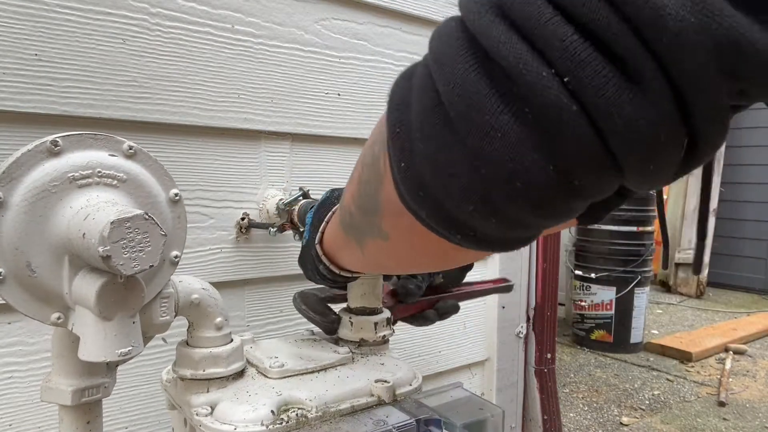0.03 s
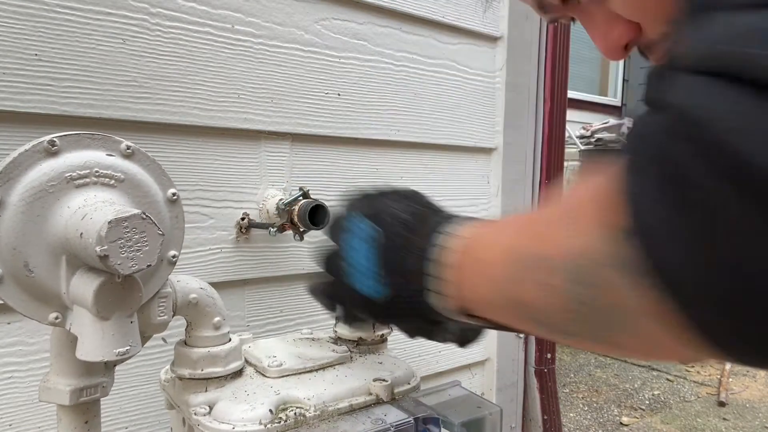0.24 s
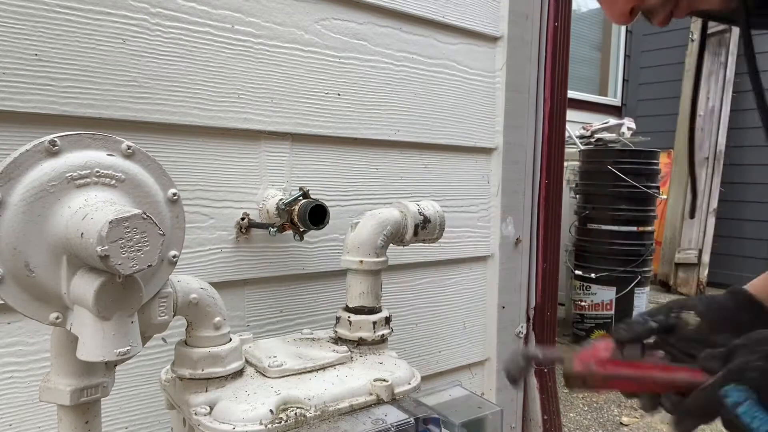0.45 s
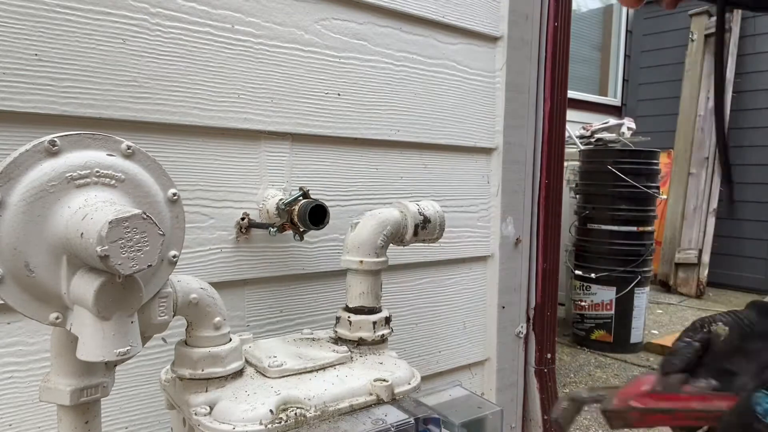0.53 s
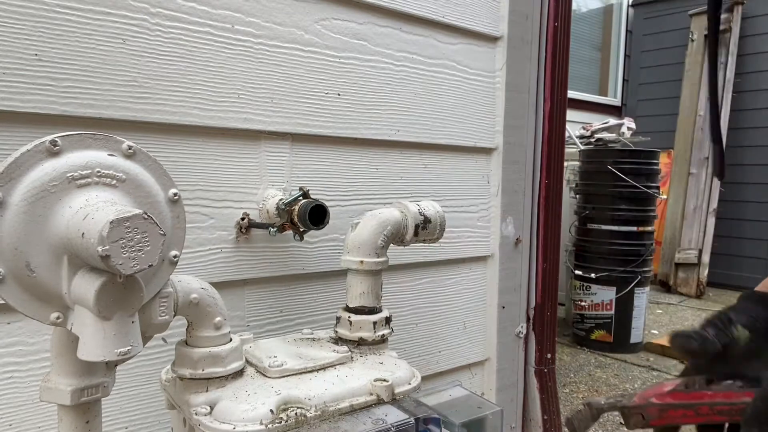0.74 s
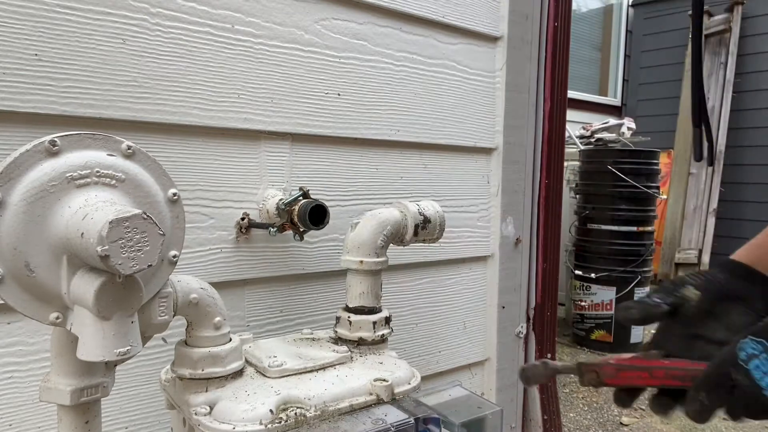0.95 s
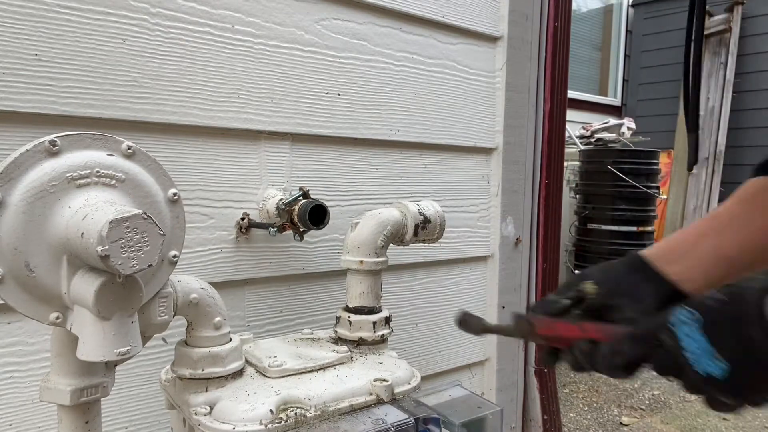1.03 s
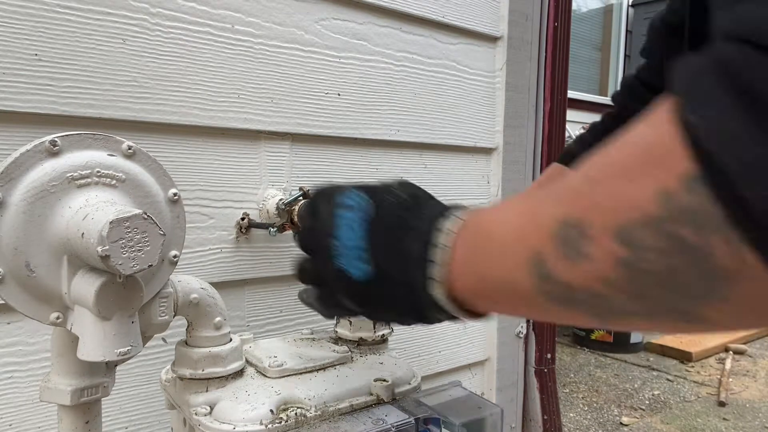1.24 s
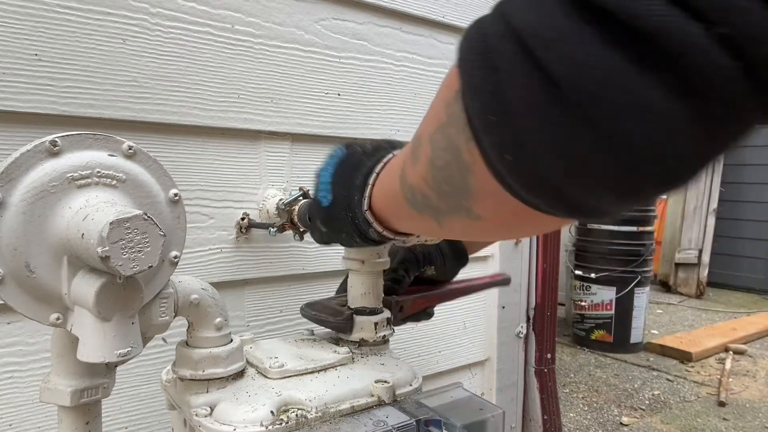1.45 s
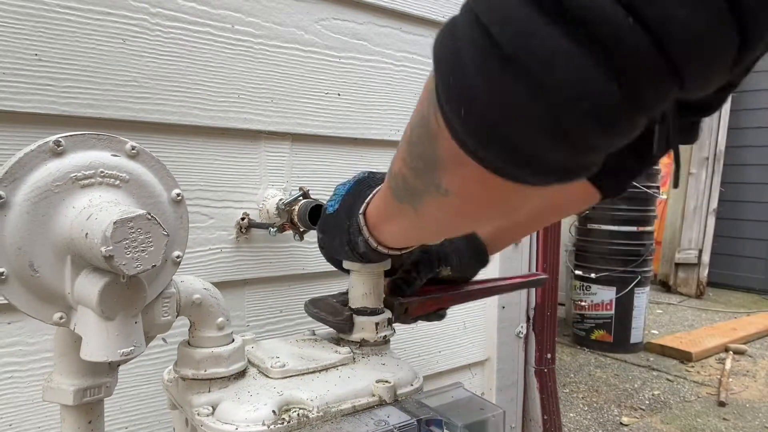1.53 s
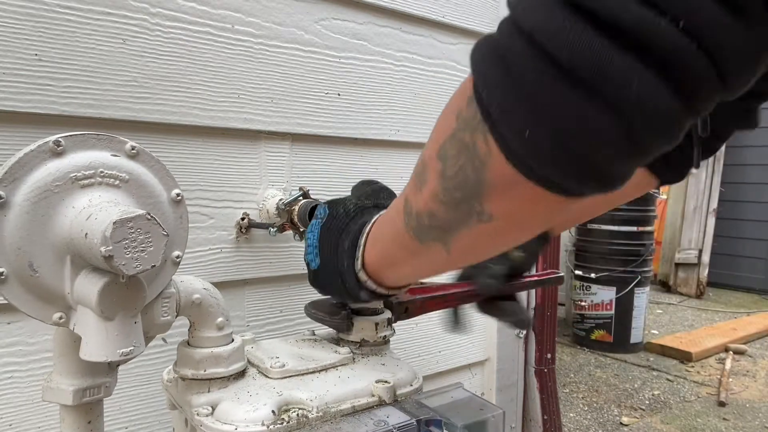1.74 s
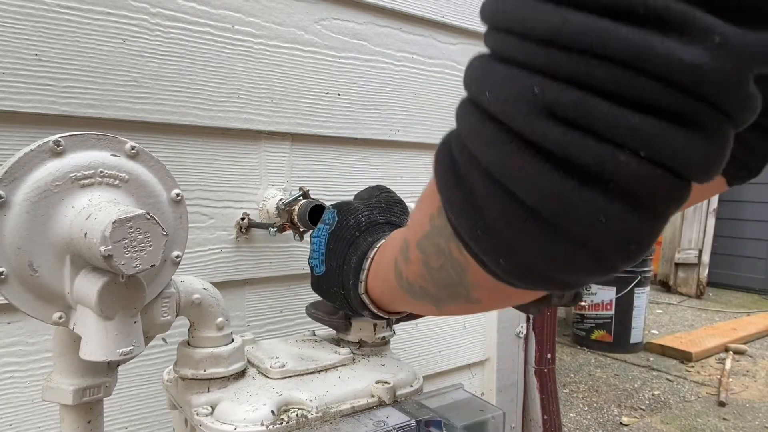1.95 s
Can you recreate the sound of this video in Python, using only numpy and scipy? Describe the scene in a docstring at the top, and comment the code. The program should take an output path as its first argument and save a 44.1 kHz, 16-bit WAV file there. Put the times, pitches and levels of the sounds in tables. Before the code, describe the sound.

Steel pipe wrench clanks and clinks against a metal pipe fitting outdoors.

```python
"""A sleeve swishes and steel clanks, close to the microphone, outdoors by a house wall.
A pipe wrench is pulled off a gas meter's pipe fitting, carried aside and set on again.
Its loose jaw clinks, and squeaks once as it sticks and slips; pipe and meter ring with dull clanks.
Gloves and sleeves rub on the metal, the yard gives short echoes, and a low rumble lies far behind."""
import sys
import numpy as np
from scipy import signal
from scipy.fft import rfft, irfft
from scipy.io import wavfile

SR = 44100
rng = np.random.default_rng(int(sys.argv[2]) if len(sys.argv) > 2 else 0)


def unload_wav(signal):
    """Save mono or channel-first audio to the path in sys.argv[1] as 16-bit WAV at rate SR, clipped to [-1, 1]."""
    wavfile.write(
        sys.argv[1],
        SR,
        np.round(np.clip(np.atleast_2d(signal).T, -1, 1) * 32767).astype(np.int16),
    )


N = 88200

# Wrench on pipe, and the loose jaw and nut rattling. Each row: start in seconds, level in dB in each
# of seven bands, contact time in seconds, share of the free ring time.
PIPE_CLANKS = [(0.1162, -47.5, -44, -40.5, -40.5, -40.5, -49, -65, 0.0014, 0.7),
               (0.2597, -39, -21.5, -36, -17.5, -19.5, -28.5, -39, 0.0029, 0.42),
               (0.2706, -46.5, -33.5, -61, -52, -50, -28.0, -38, 0.0007, 1.1),
               (1.2408, -44.0, -32.5, -34.5, -27.5, -21.5, -29, -34, 0.0023, 0.81),
               (1.277, -59, -41, -48, -50, -62, -67, -63, 0.0019, 0.9),
               (1.3045, -56, -56, -54, -45.5, -47.5, -44, -53, 0.0018, 0.45),
               (1.4145, -35, -39, -30, -34, -41, -46, -51, 0.0066, 0.45),
               (1.78, -64, -68.5, -64, -50, -62.5, -76, -64, 0.0039, 0.65)]
JAW_CLINKS = [(.148, -44, -39, -36, -47, -51, -46.5, -60, 0.0027, .55),
              (.2078, -42, -31, -22, -31.5, -39, -22.5, -42.5, 0.0024, 0.37),
              (.349, -57, -47.5, -50, -77, -77, -61, -60, 0.00044, 0.06),
              (.446, -72, -45.5, -39.5, -56, -62, -53, -58, 0.0017, 0.36),
              (.4664, -40.5, -27.5, -27.5, -32, -35, -30.5, -38.5, 0.0025, 0.34),
              (.51, -50.5, -43, -44, -47, -70, -56, -70, 0.0023, 0.68),
              (.586, -55, -44, -46, -62, -68, -63, -85, 0.00059, .5),
              (.7046, -52.5, -36, -37.5, -37.5, -50, -49.5, -63, 0.0018, 0.5),
              (.8125, -54.5, -48, -39, -61, -51, -69, -56, .013, 0.31),
              (.841, -60.5, -41.5, -50, -40.5, -68, -75, -82, .0013, 0.74),
              (.862, -50, -37.5, -33.5, -33, -44, -43.5, -56, 0.0013, 0.28),
              (.96, -70, -43.5, -41, -43.5, -42, -44, -57, 0.0016, 0.42),
              (1.0215, -57, -54, -44, -44, -55, -47.5, -66, .0011, .5),
              (1.0325, -63.5, -43.5, -42, -45, -55, -39.5, -45, .0022, 0.71),
              (1.0428, -39.5, -32, -26, -41.5, -36, -39, -44, 0.0038, 0.46),
              (1.064, -41, -43.5, -39, -61, -67, -67, -69, 0.0024, 0.31),
              (1.155, -63.5, -53, -63, -77, -85, -89, -97, .0009, 0.43),
              (1.701, -58.5, -57, -54.5, -56.5, -67, -55.5, -61, .001, .25)]
# The edges of those seven bands, in Hz.
PIPE_EDGES_HZ = [250, 550, 1150, 1550, 2800, 4200, 8000, 16000]
JAW_EDGES_HZ = [800, 1800, 4200, 8000, 9100, 9950, 14000, 16000]
# Modes of the pipe with the meter case, and of the steel jaw with its nut.
# Each row: frequency in Hz, relative level in dB before the bands are set, free t60 in seconds.
PIPE_MODES = [(230.7, -5.5, 0.2), (426, 4, .13), (645, 1, .12), (811.5, 7.5, 0.062), (1093, 17, 0.038),
              (1298, 20.5, 0.025), (1700, 16, 0.05), (2200, 2, .025), (2492, -9.5, .1), (2790, -21.5, .55),
              (3173, 25, .027), (5360, 9, 0.062), (6700, -9, .04), (10690, 1.5, 0.053)]
JAW_MODES = [(1250, 4, .17), (2260, -6, .08), (2800, 2, .04), (3410, 10, .05), (3500, -9, .25),
             (5380, 4, .08), (5850, 4, .07), (7010, 4, .09), (8680, 5, .15), (9560, 4, .07),
             (10335, 9, .065), (11025, 5, .07), (12130, 4, .08), (13310, 4, .09), (14840, 2, .1)]
# The jaw squeaking, the sleeve swinging with the arm, the glove sliding along the pipe.
# Each row: time in seconds, level in dB.
SQUEAK_LEVEL = [(.811, -60), (.8155, -31), (.821, -22), (.828, -29), (.832, -38), (.835, -32), (.845, -41),
                (.862, -49), (.91, -70)]
SLEEVE_LEVEL = [(0, -71.5), (.13, -59.5), (.37, -60), (.44, -52.5), (.53, -53.5), (.57, -63.5),
                (.645, -48.5), (.69, -62), (.79, -70), (.99, -61), (1.18, -72), (1.4, -63), (2, -79)]
GLOVE_LEVEL = [(1.44, -88), (1.525, -57.5), (1.56, -83), (1.64, -68), (1.705, -49), (1.755, -50),
               (1.81, -64.5), (2, -71.5)]
# Tone of sleeve, glove, yard echoes and distant rumble. Each row: frequency in Hz, relative level in dB.
SLEEVE_TONE = [(200, -10.5), (1300, -1.5), (3300, -0.5), (6500, -5.5), (10000, -8.5), (12000, -13),
               (15000, -13)]
GLOVE_TONE = [(200, -21.5), (1500, -4.5), (3300, -0.5), (8500, -1.5), (10500, -4.5), (13000, -0.5),
              (16000, -3)]
YARD_TONE = [(600, 2), (1700, -3), (2500, -4), (3150, -7.5), (3900, -0.5), (8000, -4.5), (15000, 0.5)]
RUMBLE_TONE = [(20, -38), (50, -19.5), (70, -10), (90, 3), (125, 3.5), (160, -1), (210, -2.5), (300, -13),
               (430, -14.5), (700, -20.5), (1500, -28.5), (3000, -50.5), (8000, -80)]
# Decay of the yard's echoes. Each row: frequency in Hz, t60 in seconds.
YARD_T60 = [(200, 0.41), (1000, 0.13), (3000, 0.23), (7000, 0.15)]
# Stereo width of the near and far sounds; the near ones narrow to the centre in the top treble.
# Each row: frequency in Hz, side gain in dB.
NEAR_WIDTH = [(300, -12.5), (700, -9.5), (1400, 3), (3200, -2.5), (5400, 4), (9500, 1), (12500, -18.5)]
RUMBLE_WIDTH = [(30, -5.5), (90, -20.5), (200, -8.5), (500, -4.5), (4000, 12.5), (12000, -1.5)]

CHATTER_DB = -10.5  # slips within a contact, against its first impact
HUMP_WIDTH_HZ, VALLEY_DB = 81.5, -1.5  # clatter round the modes: width at 1 kHz, floor between them
SQUEAK_HZ, SQUEAK_WAVER = 8710, 0.0021
RUB_GRAIN_DB, FRICTION_SIDE_DB = 1.5, -3.5
YARD_DB, YARD_DELAY_S = -12.5, .008
RUMBLE_DB, HUM_HZ, HUM_DB, HUM_WAVER = -46, 132.03, -49.5, 0.0234
PAN_RIGHT_DB, CUTOFF_HZ = 0.22, 15900


def wrench_blows(rows, modes, edges, clatter_db, clatter_t60):
    """Blows on one piece of metal, close up; a firmer grip shortens the ring."""
    out = np.zeros((2, N))
    for start_s, *band_db, contact_s, ring_share in rows:
        held_modes = [(hz, db, t60 * ring_share) for hz, db, t60 in modes]
        blow = strike(held_modes, clatter_db, clatter_t60 * ring_share, contact_s)
        add(out, start_s, strike_position(blow, edges, band_db))
    return out


def strike(modes, clatter_db, clatter_t60, contact_s):
    """A chattering contact rings the metal's modes and stirs a noisy clatter around them."""
    t = np.arange(SR // 3) / SR
    hz, db, t60 = np.transpose(modes)[:, :, None]
    phase, lean = rng.uniform(-1.054, 1, (2, len(modes), 1))
    spread = np.sign(lean) * np.arctan(amp(read(NEAR_WIDTH, hz)))  # opposite phase shift in each channel
    fade = amp(db - 60 * t / t60)
    angle = 2 * np.pi * (hz * t + phase)
    ring = np.array([(fade * np.sin(angle + channel * spread)).sum(0) for channel in (1, -1)])
    mid, side, slips = rng.standard_normal((3, len(t)))
    clatter = colour(stereo(mid, colour(side, NEAR_WIDTH)), clatter_tone(modes))
    clatter *= amp(clatter_db - 60 * t / clatter_t60)
    force = amp(CHATTER_DB) * slips * (rng.random(len(t)) < .12) * np.exp(-(t / contact_s) ** 2)
    force[0] = 1  # the first impact
    clatter = signal.fftconvolve(clatter, force[None] / np.linalg.norm(force), axes=1)[:, :len(t)]
    attack = 1 - np.exp(-2 * t / contact_s)
    return (ring + clatter) * attack


def clatter_tone(modes):
    """The clatter gathers in a broad hump at each mode. Each row returned: frequency in Hz, gain in dB."""
    mode_hz = np.transpose(modes)[0][:, None]
    hz = np.linspace(0, SR / 2, 1024)
    width_hz = HUMP_WIDTH_HZ * np.sqrt(mode_hz / 1000)
    humps = 1 / (1 + ((hz - mode_hz) / width_hz) ** 2) ** 2
    return np.transpose([hz, 10 * np.log10(humps.sum(0) + amp(VALLEY_DB) ** 2)])


def strike_position(blow, edges, band_db):
    """Where a blow lands sets each band's strength: its first 11 ms are brought to band_db."""
    hz, density = signal.periodogram(blow[:, :SR // 90], SR, "boxcar", 2048)
    bands = list(zip(edges, edges[1:]))
    power = [density[:, (hz >= lo) & (hz < hi)].mean() * (hi - lo) for lo, hi in bands]
    gain_db = np.array(band_db) - 10 * np.log10(power)
    bass_rolloff = [(edges[0] / 10, gain_db[0] - 40), (edges[0] / 2, gain_db[0])]
    shelves = [(lo * (hi / lo) ** u, db) for (lo, hi), db in zip(bands, gain_db) for u in (.1, .85)]
    return colour(blow, bass_rolloff + shelves)


def jaw_squeak():
    """The jaw sticks and slips on its thread; the friction sustains one high mode."""
    t = np.arange(N) / SR
    phase = wavering_phase(SQUEAK_HZ, SQUEAK_WAVER, rate_hz=160)
    tone = unit(stereo(np.sin(phase), amp(FRICTION_SIDE_DB) * np.cos(phase)))
    sounding = (t > SQUEAK_LEVEL[0][0]) & (t < SQUEAK_LEVEL[-1][0])
    return tone * level(SQUEAK_LEVEL) * sounding


def rub(stroke, tone):
    """Cloth or rubber slides near the microphone with a fine-grained hiss."""
    mid, side = rng.standard_normal((2, N)) * amp(RUB_GRAIN_DB * drift(300))
    return unit(colour(stereo(mid, amp(FRICTION_SIDE_DB) * side), tone)) * level(stroke)


def yard_echoes(metal):
    """Short scattered echoes come back from the wall, meter and paving."""
    taps = rng.standard_normal((2, SR // 2)) * (rng.random((2, SR // 2)) < .1)
    hz, t, spectrum = signal.stft(taps, SR, nperseg=256)
    decay = amp(-60 * t / read(YARD_T60, hz)[:, None])
    tail = signal.istft(spectrum * decay, SR, nperseg=256)[1]
    tail *= np.arange(tail.shape[1]) / SR > YARD_DELAY_S
    echoes = signal.fftconvolve(metal, tail / np.linalg.norm(tail[0]), axes=1)[:, :N]
    return amp(YARD_DB) * colour(echoes, YARD_TONE)


def distant_rumble():
    """Far-off rumble and air, with a wavering hum in the centre."""
    mid, side = colour(rng.standard_normal((2, N)), RUMBLE_TONE)
    rumble = unit(stereo(mid, colour(side, RUMBLE_WIDTH)))
    hum = np.sin(wavering_phase(HUM_HZ, HUM_WAVER, rate_hz=7.4)) * (1 + 0.14 * drift(8))
    return amp(RUMBLE_DB) * rumble + amp(HUM_DB) * unit(hum)


def amp(db):
    """Decibels to gain."""
    return 10 ** (np.asarray(db) / 20)


def unit(x):
    """Scales to rms 1."""
    return x / np.sqrt(np.mean(x ** 2) + 1e-20)


def read(points, hz):
    """Reads a table on a log-frequency axis."""
    table_hz, value = np.transpose(points)
    return np.interp(np.log(hz + 1), np.log(table_hz + 1), value)


def level(points):
    """Gain over time from rows of seconds and dB."""
    return amp(np.interp(np.arange(N) / SR, *np.transpose(points)))


def colour(x, points):
    """Filters by rows of Hz and dB."""
    n = x.shape[-1]
    gain = amp(read(points, np.fft.rfftfreq(2 * n, 1 / SR)))
    return irfft(rfft(x, 2 * n) * gain)[..., :n]


def drift(rate_hz):
    """Smooth random motion of rms 1."""
    rolloff = 1 + (np.fft.rfftfreq(N, 1 / SR) / rate_hz) ** 4
    return unit(irfft(rfft(rng.standard_normal(N)) / rolloff, N))


def wavering_phase(hz, waver, rate_hz):
    """Phase of a tone whose pitch wanders by the rms fraction waver."""
    return 2 * np.pi * np.cumsum(hz * (1 + waver * drift(rate_hz))) / SR


def stereo(mid, side):
    """Left and right from middle and side."""
    return np.array([mid + side, mid - side])


def add(mix, start_s, sound):
    """Mixes a sound in at start_s."""
    part = mix[:, round(start_s * SR):][:, :sound.shape[1]]
    part += sound[:, :part.shape[1]]


def scene():
    """The open yard: wrench and pipe close to the microphone, slightly right, the rumble far off."""
    pipe = wrench_blows(PIPE_CLANKS, PIPE_MODES, PIPE_EDGES_HZ, clatter_db=20, clatter_t60=0.031)
    jaw = wrench_blows(JAW_CLINKS, JAW_MODES, JAW_EDGES_HZ, clatter_db=8, clatter_t60=0.15)
    metal = pipe + jaw
    left, right = yard_echoes(metal) + rub(SLEEVE_LEVEL, SLEEVE_TONE) + rub(GLOVE_LEVEL, GLOVE_TONE)
    echoes_and_rubs = stereo((left + right) / 2, colour((left - right) / 2, NEAR_WIDTH))
    near = metal + jaw_squeak() + echoes_and_rubs
    return near * amp([[-PAN_RIGHT_DB], [PAN_RIGHT_DB]]) + distant_rumble()


def record(dry):
    """The recorder cuts the treble above CUTOFF_HZ."""
    lowpass = signal.firwin(255, CUTOFF_HZ, window=("kaiser", 9), fs=SR)
    return signal.oaconvolve(dry, lowpass[None], "same")


dry = scene()
out = record(dry)
unload_wav(out)
```